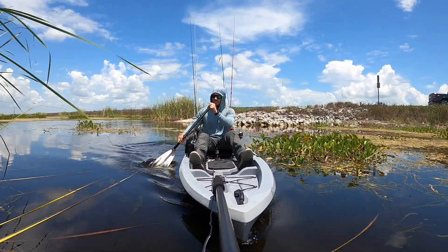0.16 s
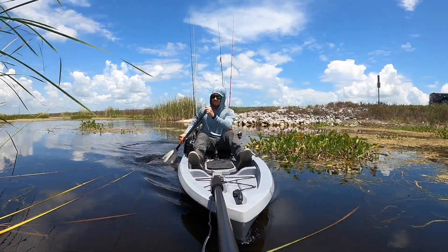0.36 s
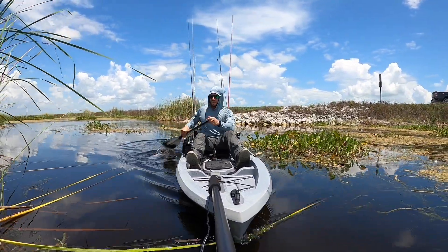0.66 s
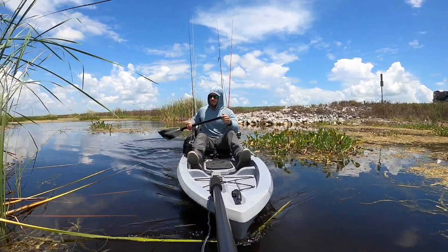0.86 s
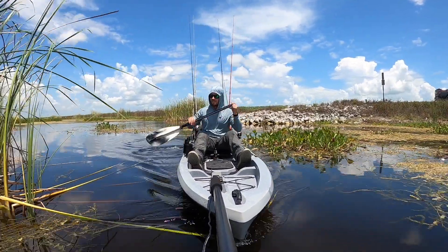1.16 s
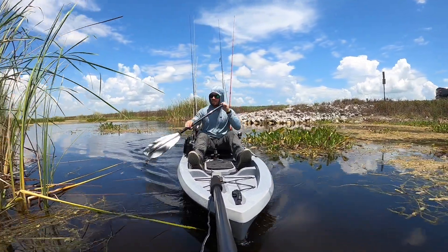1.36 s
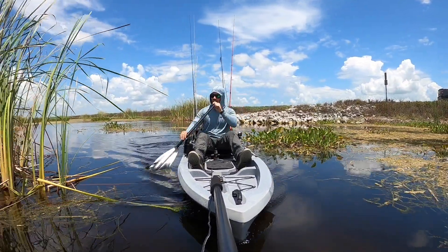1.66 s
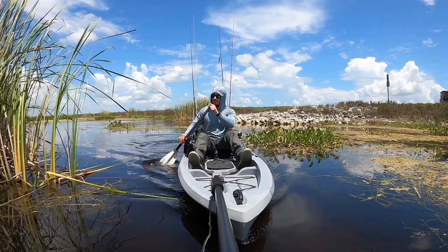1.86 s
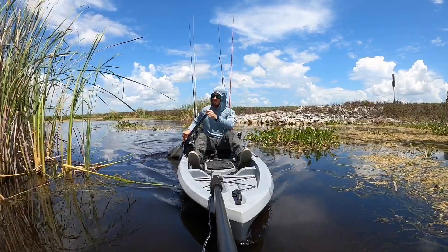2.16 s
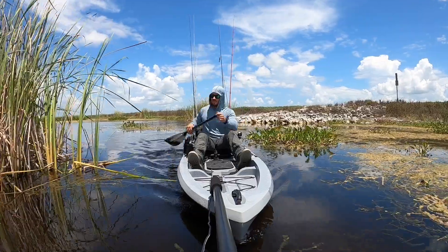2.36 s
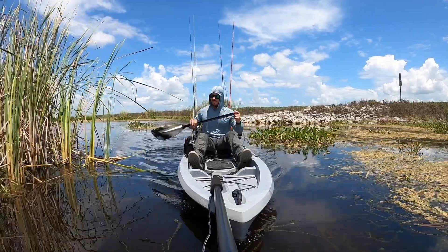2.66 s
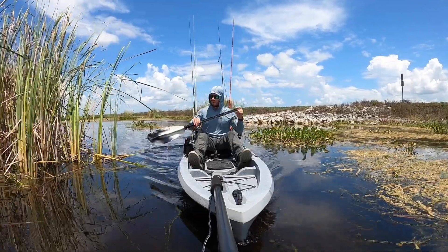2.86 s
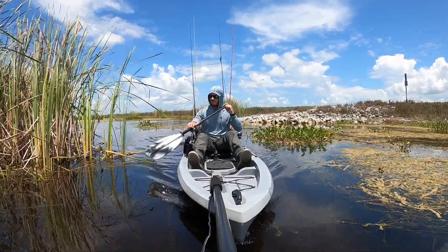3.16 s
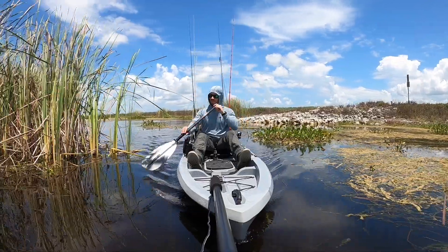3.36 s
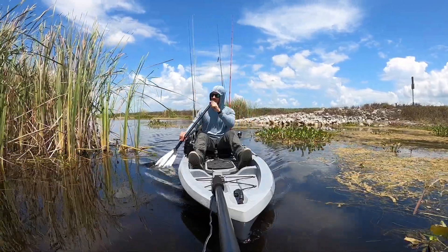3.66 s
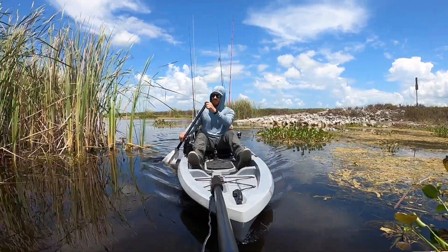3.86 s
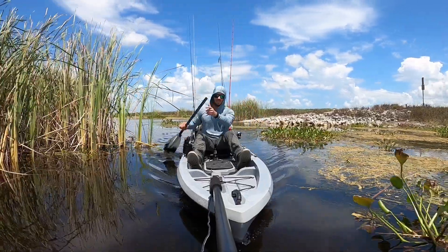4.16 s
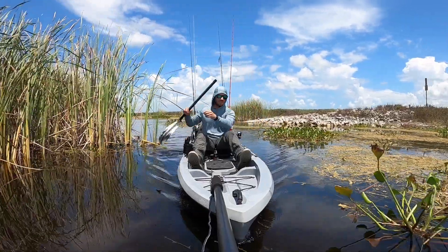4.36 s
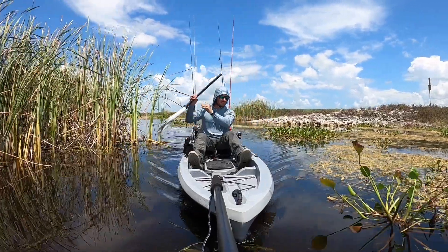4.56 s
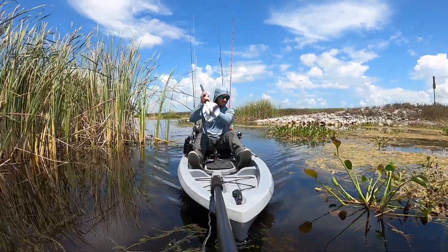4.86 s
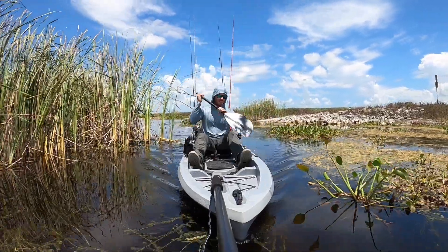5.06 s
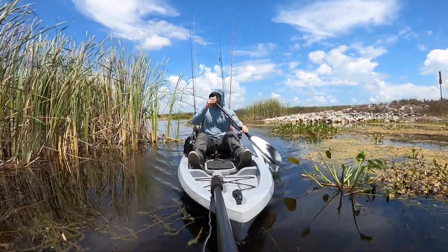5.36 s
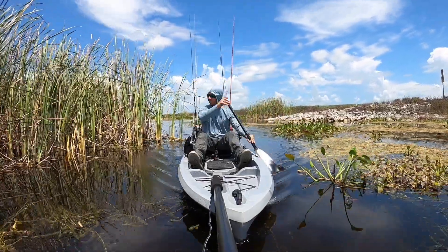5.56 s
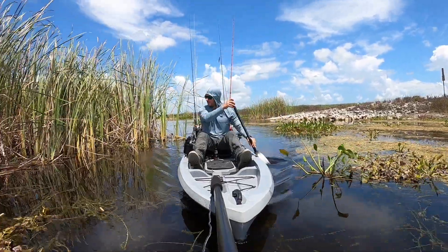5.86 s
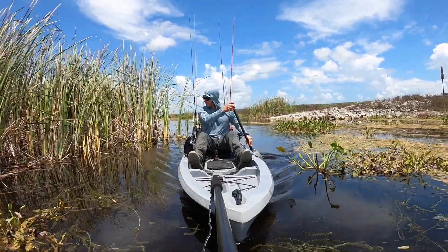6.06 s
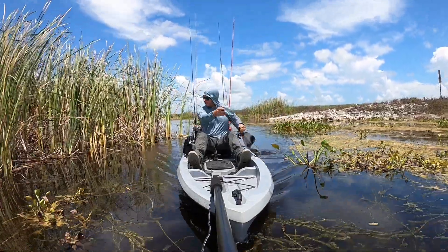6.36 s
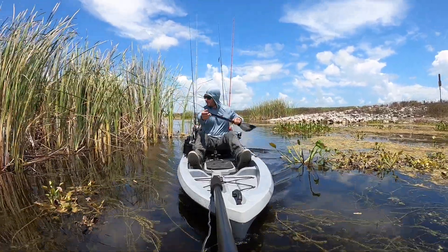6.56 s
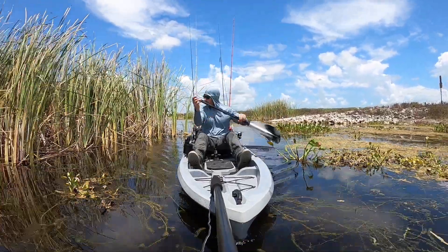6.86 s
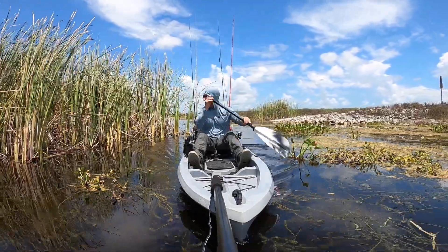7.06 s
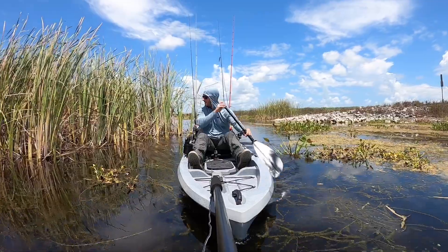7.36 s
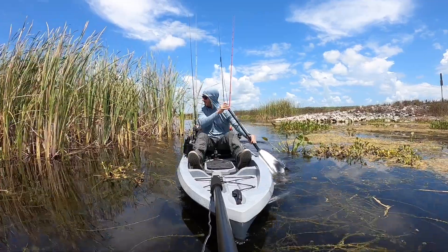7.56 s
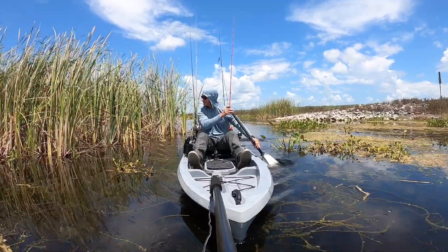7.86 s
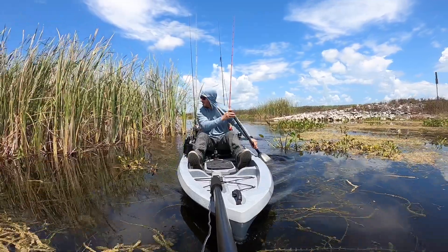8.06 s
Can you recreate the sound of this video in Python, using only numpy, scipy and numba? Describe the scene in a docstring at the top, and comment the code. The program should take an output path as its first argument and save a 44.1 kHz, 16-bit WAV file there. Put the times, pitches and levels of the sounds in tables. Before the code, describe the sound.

A paddle blade slowly strokes shallow weedy water in bubbling gurgles and drips, over a distant low engine drone, with a late knock on the hull.

```python
"""A paddle blade slowly strokes shallow weedy water beside a kayak, close to two ports on a pole at the bow.
The blade traps ringing air pockets, stirs up gurgle and fizz, squeaks as it enters and sheds drops.
A stem snaps as a short click, and the shaft knocks the hull so that all its modes ring.
Far off, a wavering low engine tone drones over shaped noise for the marsh and a faint insect hiss."""
import sys
import numpy as np
from scipy import signal
from scipy.fft import rfft, irfft, next_fast_len
from scipy.io import wavfile
from scipy.ndimage import uniform_filter1d
from numba import njit

SR = 44100
rng = np.random.default_rng(int(sys.argv[2]) if len(sys.argv) > 2 else 0)


def to_wav(sig):
    """Store sig (one row per channel, or 1-D mono) as 16-bit WAV at the path in sys.argv[1].

    Samples outside -1..1 are clipped; the rate is SR.
    """
    pcm = np.clip(np.atleast_2d(sig), -1, 1) * 32767
    pcm = np.round(pcm).astype(np.int16)
    wavfile.write(sys.argv[1], SR, pcm.T)  # frames by channels


def makeup_ratio(level_db):
    """Linear amplitude ratio for a level in decibels (20 dB per factor of ten)."""
    decades = np.asarray(level_db, float) / 20
    return 10 ** decades


N = 362061
OPPOSED = np.array([[1], [-1]])  # left and right in opposite sense


def curve(table):
    """Columns of a table, joined by straight lines in time."""
    s, *columns = np.transpose(table)
    return [np.interp(np.arange(N) / SR, s, c) for c in columns]


def on_log(table, hz):
    """Value of a (frequency [Hz], value) table on a log-frequency axis."""
    f, v = np.transpose(table)
    return np.interp(np.log(np.maximum(hz, 1)), np.log(f), v)


def band(hz, width, order=2):
    """Noise of rms 1 in a bell-shaped band."""
    size = next_fast_len(N)
    f = np.fft.rfftfreq(size, 1 / SR)
    bell = 1 / (1 + (2 * (f - hz) / width) ** 2) ** (order / 2)
    x = irfft(rfft(rng.standard_normal(size)) * bell, size)[:N]
    return x / x.std()


def walk(rate):
    """Random levels held 1 / rate s and slewed twice; spread near 1."""
    k = int(SR / rate)
    held = np.repeat(rng.standard_normal(N // k + 1), k)
    return 1.264 * uniform_filter1d(uniform_filter1d(held, k), k)[:N]


@njit
def ring(s, size, hz, t60, glide, rise, pan, turn, top):
    """Fading tones that glide in pitch, each with its own rise, place and starting phase."""
    out = np.zeros((2, N))
    for k in range(len(s)):
        fall = np.exp(-np.log(1000) / (t60[k] * SR))
        swell = np.exp(-1 / (rise[k] * SR))
        ratio = rise[k] * np.log(1000) / t60[k]
        gain = size[k] * (1 + ratio) * (1 + 1 / ratio) ** ratio  # the peak of the envelope is the size
        f, step, phase = hz[k], 2 ** (glide[k] / SR), turn[k]
        a, b = 1., 1.
        start = int(s[k] * SR)
        for i in range(max(start, 0), min(start + int(t60[k] * SR), N)):
            v = gain * a * (1 - b) * np.sin(phase)
            out[0, i] += v * pan[k]
            out[1, i] += v / pan[k]
            a, b = a * fall, b * swell
            phase += 2 * np.pi * f / SR
            f = min(f * step, top * hz[k], .45 * SR)
    return out


def tones(s, db, hz, t60_ms, glide, rise_ms, pan_db, turn):
    """Rows of fading tones; glide in octaves/s, pan as left minus right, turn in radians."""
    t60_s = np.maximum(t60_ms, .2) / 1000
    rise_s = np.maximum(rise_ms, .02) / 1000
    rows = np.broadcast_arrays(s, makeup_ratio(db), hz, t60_s, glide, rise_s, makeup_ratio(pan_db / 2), turn)
    return ring(*(np.array(r, float) for r in rows), 2.97)  # pitch climbs to 2.97 times its start at most


def swarm(db, pan_db, lo_hz, hi_hz, cycles, tail_db, slope_db, scatter_db, bunch_db, count):
    """Many random small bubbles: a few loud among many faint, surging together, mostly rising in pitch."""
    u = rng.random((count, 6)).T
    at = (u[0] * N).astype(int)
    octaves = u[1] * np.log2(hi_hz / lo_hz)
    hz = lo_hz * 2 ** octaves
    size_db = -tail_db * np.log(1 - .99 * u[2]) + slope_db * octaves + bunch_db[at]
    t60_ms = 1000 * cycles * (0.22 + 1.59 * u[3]) / hz
    # bring the whole swarm to a mean power near 1 before its level curve
    size_db -= 10 * np.log10(np.sum(makeup_ratio(2 * size_db) * t60_ms / 1000) * SR / N / 20)
    glide = 700 * (u[4] - .15) / t60_ms
    side_db = pan_db[at] + scatter_db * (2 * u[5] - 1)
    return tones(u[0] * N / SR, size_db + db[at], hz, t60_ms, glide, t60_ms / 5, side_db, 2 * np.pi * u[5])


# Open marsh at a distance: (frequency [Hz], level [dB per Hz])
MARSH_SPECTRUM = [(20, -61), (45, -59), (90, -56), (150, -59.5), (230, -72.5), (265, -75), (400, -86.5),
                  (600, -91), (1000, -88.5), (1500, -105), (2200, -105), (4000, -113), (7500, -112),
                  (10000, -113), (13500, -117), (15000, -124), (16000, -140)]
# How alike the marsh is at the two ports: (frequency [Hz], correlation [0-1])
MARSH_LIKENESS = [(25, 0.4), (45, 1), (100, 1), (160, 1), (300, 0.95), (700, 0.74), (1400, 0.5),
                  (3100, 0.071), (6800, 0.027)]


def marsh():
    """Distant rumble and air: shaped noise, alike at both ports in the bass and unrelated in the treble."""
    f = np.fft.rfftfreq(N, 1 / SR)
    alike = np.clip(on_log(MARSH_LIKENESS, f), 0, 1)
    shape = makeup_ratio(on_log(MARSH_SPECTRUM, f)) * np.sqrt(SR / 4)
    mid, side = rfft(rng.standard_normal((2, N))) * shape
    return irfft(mid * np.sqrt(1 + alike) + side * np.sqrt(1 - alike) * OPPOSED, N)


# Insects coming and going, before a 7.5 dB cut and the balance: (time [s], level [dB])
INSECT_SWELLS = [(0.0, -90.5), (1.2, -90), (1.45, -74), (1.8, -76), (2.0, -90), (2.85, -87), (3.05, -74),
                 (3.55, -70), (3.75, -92), (4.6, -88), (4.8, -70), (5.3, -72), (5.5, -79), (6.0, -76),
                 (6.2, -69), (6.68, -71), (6.8, -90), (7.5, -81), (7.75, -74), (8.21, -73)]


def insects():
    """Many high callers blur into a noise band near 12 kHz that swells and flutters, stronger at right."""
    hiss = np.array([band(12100, 3300, order=4) * makeup_ratio(2.2 * walk(28)) for _ in range(2)])
    hiss = hiss * makeup_ratio(1.2 * walk(9))
    balance_db = np.array([[-2.5], [2.5]])
    return makeup_ratio(curve(INSECT_SWELLS)[0] - 7.5 + balance_db) * hiss


# Lowest tone of the far engine, before its random waver: (time [s], level [dB])
DRONE_SWELLS = [(0.0, -34), (0.27, -27), (0.62, -37.5), (1.1, -27.5), (1.35, -39), (1.42, -24.5),
                (1.51, -36), (1.67, -22.5), (1.94, -43.5), (1.99, -27.5), (2.26, -33.5), (2.86, -33),
                (2.95, -39), (3.02, -31.5), (3.13, -25), (3.27, -38), (3.31, -33), (3.91, -30.5),
                (4.05, -54), (4.18, -31), (4.3, -44), (4.46, -30), (5.01, -32), (5.14, -52), (5.19, -31),
                (5.92, -36), (5.94, -41), (6.35, -27), (6.47, -34), (6.68, -27.5), (6.81, -45), (6.88, -33),
                (7.87, -31.5), (7.93, -38), (8.12, -27), (8.21, -34.5)]
# Looser overtones of the engine: (frequency [Hz], width [Hz], level [dB])
ENGINE_OVERTONES = [(134.7, 8.6, -44.5), (158.5, 4.8, -46.5), (214, 24.7, -50), (99, 32, -47.5)]


def engine():
    """A far engine low over the marsh: a wavering tone, with overtones smeared by distance."""
    drone_hz = 69.3 + 0.52 * walk(9) + 0.671 * walk(1.47)
    tone = np.sqrt(2) * np.sin(2 * np.pi * np.cumsum(drone_hz) / SR)
    tone = tone + 0.31 * band(60.7, 20)
    scattered = 0.11 * band(67, 10) * OPPOSED  # a little arrives from the sides
    low = makeup_ratio(curve(DRONE_SWELLS)[0] + 2.0 * walk(11)) * (tone + scattered)
    upper = 0
    for hz, width_hz, level_db in ENGINE_OVERTONES:
        smeared = band(hz, width_hz) + 0.094 * band(hz, width_hz) * OPPOSED
        upper = upper + makeup_ratio(level_db) * smeared
    return (low + upper) * makeup_ratio(np.array([[-.2], [.2]]))


# Shaft blows on the hull, close by: (time [s], level [dB], contact [ms])
HULL_KNOCKS = [(7.415, -22, 0.54), (7.4173, -12, 0.38), (7.4353, -28, 0.12), (7.4462, -22.5, 0.64)]
# Ringing modes of the hull, level added to each blow: (frequency [Hz], level [dB], t60 [ms])
HULL_MODES = [(104.2, -19, 730), (134.3, -17, 700), (188.7, -1.5, 90), (233, -12, 440), (292.4, -10, 130),
              (376, -14, 42), (446, -1, 9.5), (683, -20, 40), (944, -7.5, 17), (1110, -23, 90),
              (1400, -20, 17), (1820, -19.5, 12), (2300, -12.5, 7.7), (3600, -17, 12), (5350, -18.5, 8.9)]


def hull():
    """Every blow rings all the modes; a longer contact dulls the treble."""
    hz, mode_db, t60_ms = np.transpose(HULL_MODES)
    late_s = 0.057 * (hz ** -.5 - hz.max() ** -.5)  # low bending waves travel slower along the shell
    turn = np.pi * np.arange(len(hz))
    out = 0
    for s, db, contact_ms in HULL_KNOCKS:
        dull_db = -10 * np.log10(1 + (hz * contact_ms / 1000) ** 4)
        out = out + tones(s + late_s, db + mode_db + dull_db, hz, t60_ms, 0., 900 / hz, -3.5, turn)
    return out


# Stem snapping by the bow: (time [s], peak level [dB], frequency [Hz], half-length [ms])
STEM_SNAP = [(.6011, -5.5, 3500, .13)]


def stem():
    """A dry stem snaps: a click of barely two cycles under a bell-shaped envelope."""
    t = np.arange(N) / SR
    click = 0
    for s, db, hz, half_ms in STEM_SNAP:
        bell = np.exp(-.5 * ((t - s) * 1000 / half_ms) ** 2)
        click = click + makeup_ratio(db) * bell * np.cos(2 * np.pi * hz * (t - s) - .5)
    return click * makeup_ratio(np.array([[.6], [-.6]]))


# Fine droplets ticking at the top, before a 2.5 dB cut: (time [s], level [dB], centre frequency [Hz])
DROPLET_TICKS = [(0.3222, -53, 8590), (0.601, -47, 8200), (0.6454, -54, 8870), (0.6649, -52.5, 8540),
                 (0.7038, -47.5, 8240), (0.729, -42, 8840), (0.7826, -51, 8770), (0.8305, -57.5, 8620),
                 (0.914, -48, 8490), (0.9702, -49, 11900), (1.0475, -58, 8840), (1.1508, -50, 8600),
                 (1.3603, -55.5, 8420), (1.7185, -58, 9260), (1.7499, -50, 8800), (1.799, -44, 9000),
                 (1.8357, -44, 8400), (1.915, -56, 8100), (1.9604, -50, 9200), (2.1989, -53, 9540),
                 (2.2927, -50, 8300), (2.3261, -51, 8170), (2.415, -41, 7900), (2.4404, -51.5, 8900),
                 (2.4843, -58, 9010), (2.5167, -57, 8210), (2.5356, -55, 8900), (2.852, -51, 8700),
                 (2.9936, -57, 8900), (3.2894, -54, 9360), (3.6481, -55, 8700), (3.6561, -52, 9230),
                 (3.6855, -60, 9990), (3.7474, -54, 8690), (4.125, -45.5, 8800), (4.2228, -51, 11900),
                 (4.2592, -66, 8600), (4.3844, -62, 8000), (4.3844, -56, 8600), (4.4149, -49, 9600),
                 (4.7937, -56, 9290), (5.475, -55, 9430), (6.195, -54, 8980), (6.4438, -58, 8720),
                 (6.4687, -52, 8710), (6.6722, -61, 8590), (7.0309, -56, 9170), (7.1117, -62, 8400),
                 (7.124, -62, 8660), (7.1626, -54, 8900), (7.186, -51, 8000), (7.215, -54, 8560),
                 (7.4175, -56, 8350), (7.447, -43, 8970), (7.543, -52, 8830), (7.5792, -57, 8350),
                 (7.6969, -56, 8850), (7.717, -56, 8880), (8.0925, -64, 8540), (8.109, -50, 8350)]


def ticks():
    """Each droplet is a short cluster of eight very high, very brief rings."""
    s, db, hz = (np.repeat(c, 8) for c in np.transpose(DROPLET_TICKS))
    u = rng.random((len(s), 3)).T
    octaves = u[1] - .45
    pitch_hz = np.minimum(hz * 2 ** octaves, 14500)
    size_db = db - 2.5 - 6 * abs(octaves)
    return tones(s + 0.0013 * u[0], size_db, pitch_hz, 2.1, 0., .15, 0., 2 * np.pi * u[2])


# Drops bursting on the surface near the bow, side before a small scatter; the rows at 7.416 s and 7.4445 s are
# instead the high rattle of the shaft knocking the hull: (time [s], level [dB], centre frequency [Hz], left
# minus right [dB], spread [octaves])
SURFACE_DROPS = [(0.137, -52, 5300, -0.5, 1.9), (0.165, -43.5, 4940, 1, 1.5), (0.322, -38, 2930, 1.0, 1.2),
                 (0.342, -39, 3840, 1.0, 1.05), (0.391, -44, 3330, 1.0, 0.5), (0.421, -46, 3470, 1.5, 0.9),
                 (0.505, -39, 2750, 7, 1.8), (0.5536, -43.5, 5260, 3, 1.5), (0.6948, -45, 3380, 0.5, 1.7),
                 (0.7122, -35, 2600, 0.5, 1.9), (0.727, -36.5, 3600, 1, 1.4), (0.754, -38, 3700, 0.0, 1.8),
                 (0.784, -37.5, 3720, 2.0, 1.7), (0.808, -37.5, 3470, 4, 1.9), (0.84, -40, 3630, 0, 0.96),
                 (0.906, -43, 3500, 1.0, 1.8), (0.9268, -36.5, 5450, 1.5, 2),
                 (1.056, -45.5, 4560, 1.5, 1.7), (1.1055, -43, 3600, 1.5, 2.3),
                 (1.1503, -41, 3930, 0.5, 1.8), (1.647, -51, 3900, -4, 1.6), (1.6623, -37, 3600, 4, 1.6),
                 (1.748, -42.5, 3900, 2, 2), (1.8063, -40, 5630, -1.0, 2.2), (1.835, -35.5, 3040, 1, 2.2),
                 (1.845, -44, 3100, 4, 1.9), (1.871, -46, 3700, 1.5, 1.5), (1.902, -45, 2930, 1, 1.5),
                 (1.918, -46.5, 4900, 1, 0.78), (1.968, -46, 3200, 0.5, 1.5), (1.984, -40, 2900, 1, 2.1),
                 (2.037, -47, 3900, 0.5, 2.4), (2.1825, -39.5, 3700, 1.0, 2.2),
                 (2.2917, -37, 4500, -1.0, 2.4), (2.3076, -32.5, 3820, 2, 2.3), (2.394, -50, 6150, 0.0, 1),
                 (2.412, -42, 3400, 2, 0.3), (2.46, -50, 3530, 0.0, 1.4), (2.4892, -48, 3470, 0.5, 1.2),
                 (2.6965, -54, 4550, 1.0, 2.3), (2.799, -41.5, 3730, 1.0, 2.4),
                 (2.9925, -49.5, 6880, 4, 2.8), (3.29, -61.5, 6370, -11, 2.1), (3.459, -52.5, 7200, 4, 0.6),
                 (3.644, -42, 6640, -2, .7), (3.6555, -36.5, 7030, 3, 0.59), (3.672, -45, 4580, 1, 1.35),
                 (3.7468, -37.5, 3380, 1, 2.7), (3.83, -51.5, 4300, 2.0, 0.9),
                 (3.9435, -56.5, 5600, 0.0, 1.1), (4.125, -42, 3900, 0, 2.8), (4.147, -34.5, 4100, 3, 2.6),
                 (4.1914, -59, 5750, 2.0, 1.6), (4.215, -39, 2460, 0.5, 1.6), (4.232, -42, 2800, 1, 1.8),
                 (4.2867, -48, 3500, 1.0, 1.7), (4.3031, -59, 5030, 0.5, 1.6),
                 (4.3412, -49, 4060, 0.5, 2.6), (4.386, -48, 3480, 1.5, 1.8),
                 (4.414, -45.5, 3420, 0.0, 2.1), (4.7064, -61, 3600, -2, 1.7), (5.74, -57, 3490, 0, 1.3),
                 (5.913, -51, 4300, 0.0, 1.5), (6.212, -48.5, 3300, 2, 1.15),
                 (6.435, -44.5, 3790, -1.0, 1.8), (6.471, -45, 5770, -1.0, .9),
                 (6.5007, -42.5, 3500, -3, 1.2), (6.535, -44, 4200, 0, 1.2), (6.547, -59, 5360, 0, 0.72),
                 (6.3, -50, 3600, 0, 1.8), (6.6, -47, 3230, -1, .8), (6.7655, -46, 3320, -3, 1.7),
                 (6.8, -56, 3300, -1, 1.5), (6.895, -55.5, 3500, -3, 1.6), (6.9158, -49, 3400, -2, 1.3),
                 (7.0314, -56.5, 5800, -1, 1.1), (7.125, -53.5, 8700, -3, 2), (7.1486, -41, 6560, 12, 0.49),
                 (7.15, -39.5, 3600, 13, 2.5), (7.165, -48, 6500, 8, 1), (7.1884, -60, 3750, -8, 2.2),
                 (7.416, -38, 3450, -2, 2.4), (7.4445, -38, 3600, 2, 2.2), (7.5028, -55, 4770, -1.5, 1.7),
                 (7.5425, -57, 4000, -3, 2.1), (7.647, -58, 5660, -2.0, .8), (7.597, -49, 4830, -2, 0.51),
                 (7.618, -46, 4850, -1, 2.5), (7.7175, -54, 4100, -5, 2), (7.769, -53, 6350, -1, 1.1),
                 (7.858, -49.5, 4000, -2, 1.2), (7.892, -50, 4800, 1, 1.8), (7.9748, -52.5, 4340, 0, 1.4),
                 (8.038, -47, 3760, -1.5, 2.1), (8.064, -44.5, 3800, -3, 1.3), (8.093, -43, 3750, 1.5, 1.8),
                 (8.108, -41, 3830, -1, 1.5), (8.1888, -42.5, 3500, -1.0, 2.1)]


def drops():
    """Each drop bursts into a cluster of 40 tiny bubbles, thickest near its start and fading after."""
    s, db, hz, pan_db, spread = (np.repeat(c, 40) for c in np.transpose(SURFACE_DROPS))
    u = rng.random((len(s), 4)).T
    t60_ms = 45
    late_ms = .5 * t60_ms * u[0] ** 1.1 - 2.5 * u[2] ** 3  # a few come slightly early
    octaves = spread * (u[1] - .55)
    pitch_hz = np.minimum(hz * 2 ** octaves, 14800)
    size_db = db - 60 * late_ms / t60_ms - 9 * abs(octaves) - 5 * np.maximum(octaves, 0)
    side_db = pan_db + 4 * (u[2] - .5)
    return tones(s + late_ms / 1000, size_db, pitch_hz, 26000 / pitch_hz, 30., 0.25, side_db,
                 2 * np.pi * u[3])


# Air squeezed out from under the blade as it enters, before flutter:
# (time [s], pitch [Hz], level [dB])
BLADE_SQUEAK = [(1.843, 1448, -62), (1.85, 1400, -45.5), (1.865, 1150, -49), (1.875, 1042, -51),
                (1.89, 1157, -49), (1.91, 1193, -44), (1.93, 1070, -50), (1.943, 1060, -53),
                (1.95, 1000, -73), (1.97, 1000, -130)]


def squeak():
    """Air squeezed out under the blade: a wavering, fluttering whistle with a fuzzy edge."""
    hz, db = curve(BLADE_SQUEAK)
    db[:int(BLADE_SQUEAK[0][0] * SR)] = -130  # silent before it begins
    pitch_hz = hz * (1 + .07 * walk(200) + .04 * walk(700))
    return np.sqrt(2) * makeup_ratio(db + 5.3 * walk(160)) * np.sin(2 * np.pi * np.cumsum(pitch_hz) / SR)


# Side of the strokes: (time [s], left minus right [dB])
SIDE_OF_STROKES = [(0, 0), (4.9, 1), (5.4, 3.5), (6.2, -2), (6.8, -1), (7.16, 5), (7.3, -1), (8.21, -2.5)]


def stroke_side():
    """The stirred water moves between the ports with the strokes."""
    return curve(SIDE_OF_STROKES)[0]


# How hard the blade stirs the water; more froth is brighter: (time [s], churn [dB], froth [dB])
BLADE_CHURN = [(0, -57, 4.5), (.22, -55.5, 3.5), (.32, -51.5, 5.5), (.5, -48.5, -0.5), (.6, -46, -2.5),
               (.72, -46.5, 8), (.765, -51.5, 8), (.82, -46.5, 7), (.88, -47.5, 5.5), (.95, -50.5, 10),
               (1.01, -54, 2), (1.07, -53, 8.5), (1.15, -49, 3), (1.25, -50.5, 1), (1.29, -54.5, 7.5),
               (1.4, -55, 6.5), (1.47, -57.5, 3.5), (1.78, -62, 6), (1.86, -57.5, 8.5), (2.05, -50.5, -1),
               (2.24, -46.5, 0), (2.37, -49.5, 5), (2.55, -54, 7), (2.65, -55.5, 3.5), (3.02, -58, 0.5),
               (3.3, -65, -1), (3.62, -65.5, 6), (3.67, -59, 8.5), (3.72, -65, -6), (3.76, -57.5, 7),
               (3.8, -61.5, -16), (3.89, -61.5, -1), (3.94, -60.5, 4), (3.985, -58, -16), (4.02, -53, -13),
               (4.045, -73, -12), (4.08, -55, -6), (4.17, -53, 5.5), (4.24, -54.5, 7.5), (4.28, -56.5, 3.5),
               (4.35, -54, 9), (4.43, -57.5, 6.5), (4.5, -55.5, 0), (4.8, -62, 5), (4.99, -67, -5.5),
               (5.5, -67.5, -18), (5.75, -57.5, -4), (5.8, -63.5, -8), (5.92, -57.5, -0.5),
               (5.98, -62, -14), (6.15, -59, -2), (6.36, -51, -8), (6.46, -49, 3), (6.55, -55, 2),
               (6.68, -50, 3.5), (6.79, -54.5, 1), (6.83, -57.5, -6.5), (6.91, -57.5, 4), (6.95, -60.5, -4),
               (7.05, -61.5, -4), (7.2, -56.5, 1), (7.32, -60, -20), (7.62, -61, 3.5), (7.8, -63, 0.5),
               (8.08, -57.5, 0.5), (8.21, -62, 0)]
# How a layer follows the blade: (level [dB], churn slope [dB per dB], froth slope [dB per dB])
GURGLE, BABBLE, FIZZ = (-57.5, 0.86, -0.0027), (-54.5, 1.29, -0.18), (-64, 1.37, 1)
SPRAY, DRIPS = (-76, 1, 1.38), (-61, 1.8, -0.12)
# An even rush of fine bubbles: (level [dB], churn slope [dB per dB], froth slope [dB per dB])
WASH_FOLLOW = (-67.5, 2.1, 0.54)
# The finest spray: (level [dB], churn slope [dB per dB], froth slope [dB per dB])
MIST_FOLLOW = (-82.5, 1.4, 1.1)


def stirred_water():
    """Swarms of bubbles from low gurgle to finest spray, each following the churn and froth of the blade."""
    churn_db, froth_db = curve(BLADE_CHURN)
    pan_db = stroke_side()

    def follow(layer):
        """Level curve of a layer, at its own level for a churn of -53 dB without froth."""
        db, churn_slope, froth_slope = layer
        return db + churn_slope * (churn_db + 53) + froth_slope * froth_db

    # each little slop of water sets off bubbles of all sizes together
    slop, spit = 2.2 * walk(40), walk(130)  # dB
    gurgle = swarm(follow(GURGLE), pan_db, 286.3, 741, cycles=11.6, tail_db=2.6, slope_db=4.2,
                   scatter_db=1.3, bunch_db=1.5 * slop, count=3500)
    babble = swarm(follow(BABBLE), pan_db, 851, 1736, cycles=12.4, tail_db=5.44, slope_db=-2.3,
                   scatter_db=1.3, bunch_db=slop + 1.5 * spit, count=13000)
    fizz = swarm(follow(FIZZ), pan_db + 3.0, 1820, 5500, cycles=12.8, tail_db=3.4, slope_db=-2.4,
                 scatter_db=2.7, bunch_db=slop + 1.6 * spit, count=26000)
    spray = swarm(follow(SPRAY), pan_db + 1.5, 5350, 11500, cycles=19.5, tail_db=4.7, slope_db=-14.0,
                  scatter_db=13.0, bunch_db=1.3 * slop + 3.5 * spit, count=24000)
    # an even rush of fine bubbles runs under the slops
    wash = swarm(follow(WASH_FOLLOW), pan_db, 900, 7000, cycles=8, tail_db=1.5, slope_db=-2.3,
                 scatter_db=3., bunch_db=0.83 * slop + 1.5 * spit, count=12000)
    # plump drips trickle off the blade
    drips = swarm(follow(DRIPS), pan_db, 600, 3000, cycles=18, tail_db=1.1, slope_db=-0.88,
                  scatter_db=2.5, bunch_db=slop, count=2600)
    mist = swarm(follow(MIST_FOLLOW), pan_db, 7000, 14500, cycles=25, tail_db=4.1, slope_db=-3.5,
                 scatter_db=3.6, bunch_db=2.9 * slop + 2. * spit, count=6000)
    return gurgle + babble + fizz + spray + wash + drips + mist


# Air pockets trapped by the blade close to the ports, level before flutter:
# (time [s], peak level [dB], start pitch [Hz], t60 [ms], glide [octaves/s])
AIR_POCKETS = [(0.131, -37, 2180, 6.2, 34), (0.168, -40.5, 1430, 57, 29), (0.248, -32, 1010, 22, -17),
               (0.31, -30.5, 1110, 9.6, 13), (0.378, -39.5, 447, 140, 9.5), (0.363, -41, 1480, 36, 42),
               (0.446, -33, 1003, 29, 2), (0.454, -40, 2100, 23, 11), (0.566, -31, 771, 14, 10),
               (0.572, -33, 1098, 11, 17), (0.612, -36, 2900, 10, 5), (0.626, -32.5, 970, 45, 10),
               (0.661, -41, 2380, 35, 17), (0.72, -26, 613, 23, -2), (0.577, -27, 552, 45, -7),
               (0.578, -24.5, 309.6, 35, 6), (0.644, -18, 690, 5.2, 19), (0.661, -29, 580, 40, 5),
               (0.663, -33, 968, 71, 13), (0.713, -19.5, 1400, 5.2, -12), (0.712, -24, 854, 48, 7.5),
               (0.728, -34, 2300, 32, 0), (0.811, -41, 3100, 32, -12), (0.87, -31, 1400, 9.7, -5),
               (0.889, -30.5, 581, 96, 47.5), (0.905, -25, 992, 63, 22), (1.164, -32, 890, 46, 0),
               (1.195, -34, 472, 39, 52), (1.26, -36.5, 2010, 9.3, -6), (1.357, -30, 990, 7.7, 23),
               (1.39, -38.5, 344, 39, 51), (1.669, -29, 2850, 6.7, 85), (1.749, -29, 1060, 34, -6),
               (1.807, -32.5, 2620, 7.5, -11.5), (1.836, -36, 1370, 21, 3), (1.884, -39, 1400, 31, 7),
               (1.965, -46, 770, 35, 3), (2.013, -46, 1800, 12, 0), (2.048, -55, 3150, 10, 0),
               (2.106, -45, 3600, 10, 0), (2.424, -49, 2200, 9, 0), (2.549, -38, 3020, 7.9, 10),
               (2.622, -44, 1950, 10, 0), (2.587, -42, 600, 23, 5), (0.425, -40, 2000, 18, 10),
               (0.414, -48, 2650, 12, 0), (0.491, -34, 1154, 10, 0), (0.506, -30.5, 1153, 20, -8),
               (0.52, -40, 2260, 12, 0), (0.565, -47, 2270, 20, 2), (3.639, -44, 2300, 12, 0),
               (3.64, -43, 1440, 16, -30), (3.649, -41, 2250, 7.3, -10), (3.658, -37, 825, 13, 7),
               (3.671, -44, 1200, 10, 30), (3.74, -51, 3700, 8.7, 0), (3.767, -45, 1350, 15, 0),
               (3.79, -51, 1145, 25, 0), (3.864, -49, 760, 16, 0), (3.858, -58, 3200, 11, 0),
               (4.355, -45, 1600, 25, 8), (4.445, -46, 1260, 25, 0), (4.516, -46.5, 2980, 11, 0),
               (4.582, -53, 2000, 15, 0), (4.608, -46, 1960, 15, -5), (4.743, -51, 2500, 12, 0),
               (4.86, -57, 2190, 53, 25), (5.024, -60.5, 2580, 8, -1), (5.153, -59, 1970, 8, 0),
               (5.18, -56, 4200, 5.3, 21), (5.387, -60.5, 5400, 6, 0), (5.469, -56, 3600, 10, 20),
               (7.503, -50, 2000, 20, 9.5), (7.543, -47, 2440, 13, -10), (7.544, -50, 3100, 9, 0),
               (7.573, -39, 1600, 7, 0), (7.603, -37, 1670, 25, 10), (7.611, -48, 3440, 9, 10),
               (7.637, -42, 2300, 13, 10), (7.655, -47, 1600, 15, 0), (7.719, -47.5, 3430, 12, -7),
               (7.724, -44, 1700, 9, -2), (7.768, -52, 1400, 100, 17), (1.983, -28.5, 1430, 19, -22),
               (2.065, -31, 1000, 27, 29), (2.08, -42, 2730, 14, 10), (2.084, -38, 925, 55, -1),
               (2.125, -36.5, 472, 47, -3), (2.144, -37, 1400, 17, 14), (2.188, -40, 1030, 30, 8),
               (2.214, -32, 1510, 35, 6), (2.228, -34, 1130, 22, 17), (2.262, -37, 660, 21, 5),
               (2.293, -33, 2840, 14, 3), (2.361, -26, 1030, 12, 4), (2.464, -41, 1290, 47, 8.5),
               (2.488, -40, 1390, 30, 11), (2.503, -43, 700, 42, 1), (2.527, -37.5, 970, 16, 17),
               (2.556, -44, 870, 25, 12), (2.09, -37, 1690, 25, 34), (2.126, -34, 1010, 52, -10),
               (2.221, -27.5, 2090, 15, 30), (2.263, -26.5, 1240, 20, 17), (2.298, -25, 1280, 4.5, 72),
               (2.312, -35, 517, 70, 36), (2.334, -24, 820, 7.9, 17), (2.369, -21.5, 1180, 4.6, -10),
               (2.367, -22, 600, 18.4, -15), (2.369, -24, 1990, 11, 46), (2.399, -38, 435, 74, 5),
               (2.446, -36, 1180, 27, 36), (2.509, -37.5, 2930, 12, 1), (2.578, -41, 2890, 10, -11),
               (2.585, -42, 1230, 20, 12), (2.697, -37.5, 2780, 7.8, 28), (2.752, -41.5, 1460, 22, -14),
               (2.799, -41, 2260, 11, 23), (2.808, -32, 379, 49, 39), (3.648, -33.5, 754, 25, 6.5),
               (3.649, -33, 1230, 9.5, 10), (3.748, -18.5, 1045, 16.5, 82), (3.813, -55, 1930, 37, 88),
               (3.861, -43, 1400, 12, 0), (3.951, -44, 980, 37, 15), (4.192, -38, 1760, 25, 15),
               (4.222, -39.5, 1140, 18, 11), (4.252, -40.5, 1400, 30, 8), (4.286, -36, 3400, 6.4, -2),
               (4.408, -40.5, 1230, 30, -7), (4.16, -46, 1010, 20, 10), (4.165, -37.5, 1760, 16, -14),
               (6.0, -57, 1500, 25, 8), (6.11, -57, 1310, 24, 10), (4.61, -49, 1460, 29, 17),
               (3.831, -38, 2220, 12, 50), (3.963, -40.5, 1180, 23, 14), (4.01, -41.5, 1710, 37, 10),
               (4.069, -25, 1250, 3.5, 13), (4.126, -32, 830, 27, 15), (4.15, -20, 3050, 2.6, 44),
               (4.15, -20.5, 1360, 13, -19), (4.15, -29.5, 736, 68, -1.5), (4.184, -33, 2200, 6.6, 15),
               (4.284, -33.5, 1700, 12, 20), (4.344, -39, 2190, 6.2, 27), (4.385, -43, 1910, 46, -14),
               (4.517, -42.5, 1040, 56, 18), (4.54, -40, 1370, 19, 18), (4.675, -46, 2160, 14, -20),
               (4.785, -51, 2300, 27, 5), (5.654, -37.5, 1810, 8.6, -15.5), (5.722, -32.5, 1710, 22, 51),
               (5.837, -45.5, 2300, 5.2, 37), (5.735, -44.5, 2090, 13, 10), (6.135, -49, 1700, 15, 10),
               (5.901, -38.5, 1020, 10, -7), (5.916, -50, 1980, 27, 18), (6.076, -55, 2960, 19, -15),
               (6.167, -44, 2080, 17, -10), (6.196, -39, 1100, 21, 90), (6.211, -30, 1540, 6.2, -4),
               (6.211, -27.5, 835, 36, 21.5), (6.25, -28, 1550, 11.3, 44), (6.249, -26.5, 856, 22, 46),
               (6.3, -41.5, 697, 120, -5), (6.336, -42, 565, 100, -7), (6.568, -42, 800, 33, 0),
               (6.651, -41, 1320, 29, 7), (6.687, -31.5, 1500, 8.6, 10), (6.737, -40, 1270, 24, 6),
               (6.348, -36, 1730, 11, 5), (6.388, -41, 366, 90, 13), (6.447, -34.5, 1003, 63, 19.5),
               (6.515, -30, 1130, 14, 19), (6.666, -42, 2090, 21, -25), (6.68, -40, 434, 80, -16),
               (6.734, -42.5, 1670, 44, 0), (6.767, -43, 1738, 21, -3), (7.432, -35.5, 633, 90, -31),
               (7.471, -34.5, 390, 62, -10), (7.448, -39, 322, 120, -8), (7.49, -31, 261, 110, -7),
               (7.551, -28, 1002, 43, -10.5), (7.575, -36, 773, 75, 19), (7.58, -35.5, 2160, 15, -12),
               (7.591, -35, 920, 37, 10), (7.622, -19, 1220, 12, -44), (7.626, -22.5, 1710, 5.1, 83),
               (7.733, -41.5, 1530, 26, -10), (7.937, -43, 1500, 17, 11), (7.95, -33.5, 612, 144, -0.5),
               (8.072, -37.5, 1620, 9.5, 16), (8.089, -42, 2800, 11, -13), (8.101, -44, 1506, 110, -9.5),
               (8.188, -40.5, 1650, 26, 5)]


def air_pockets():
    """Each trapped pocket rings with a gliding pitch and sheds smaller neighbours as it breaks up."""
    s, db, hz, t60_ms, glide = np.transpose(AIR_POCKETS)
    pan_db = stroke_side()[(s * SR).astype(int)]
    rise_ms = 0.035 * t60_ms + 0.85 * 1000 / hz  # a share of t60 plus some cycles
    pockets = makeup_ratio(0.96 * walk(220)) * tones(s, db, hz, t60_ms, glide, rise_ms, pan_db, 0 * s)
    # four small neighbours for every pocket
    u = rng.random((len(s), 4, 4)).T
    late_ms = .6 * np.minimum(t60_ms, 40) * u[0]
    shed_db = db - 12 - 8 * u[1] - 22 * late_ms / t60_ms
    shed_hz = hz * 2 ** (1.1 * (u[2] - .4))
    columns = (s + late_ms / 1000, shed_db, shed_hz, 9000 / hz, 20 * u[3], 900 / hz, pan_db, 2 * np.pi * u[3])
    shed = tones(*(np.ravel(c + 0 * u[0]) for c in columns))
    return pockets + shed


def paddle():
    """Single pockets of air ring out over the stirred water."""
    return air_pockets() + stirred_water()


# The housing shades the left port: (frequency [Hz], left minus right [dB])
PORT_SHADE = [(3000, -0.5), (5000, -1), (7500, 0), (9000, -8.5), (13000, -3)]


def shade(x):
    """Treble from the water reaches the right port more strongly."""
    size = next_fast_len(N)
    db = on_log(PORT_SHADE, np.fft.rfftfreq(size, 1 / SR))
    return irfft(rfft(x, size) * makeup_ratio(np.array([db, -db]) / 2), size)[:, :N]


def reflections(near):
    """Short soft echoes off the deck and the water surface, as a burst of fading noise."""
    t = np.arange(int(0.064 * SR)) / SR
    echo = rng.standard_normal((2, len(t))) * makeup_ratio(-60 * t / 0.13) * (t > .0008)
    echo = echo / np.sqrt(np.sum(echo ** 2) / 2)
    return makeup_ratio(-12.5) * signal.fftconvolve(near, echo, axes=1)[:, :N]


def scene():
    """The near water, hull and stem with their echoes, over the far engine, marsh and insects."""
    near = shade(paddle() + squeak() + drops() + ticks() + hull() + stem())
    return near + reflections(near) + engine() + marsh() + insects()


def top_cut(x):
    """Nothing passes above the cut-off."""
    return signal.sosfilt(signal.butter(12, 15690, fs=SR, output="sos"), x)


def record(dry):
    """The left port hears everything a little later."""
    lag_s = np.array([[2.8e-5], [0]])
    delay = np.exp(-2j * np.pi * np.fft.rfftfreq(N, 1 / SR) * lag_s)
    ports = irfft(rfft(dry) * delay, N)
    return top_cut(ports)


dry = scene()
out = record(dry)
to_wav(out)
```